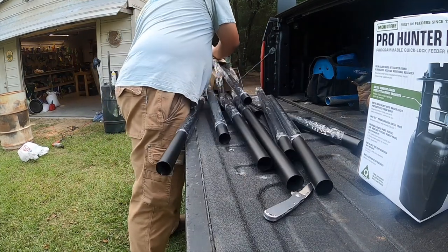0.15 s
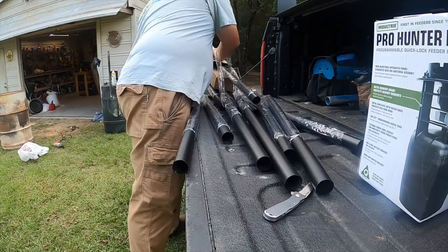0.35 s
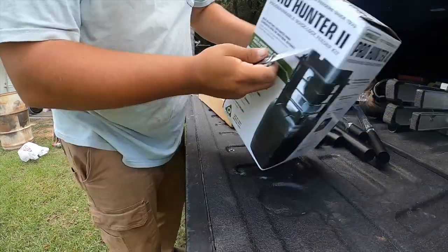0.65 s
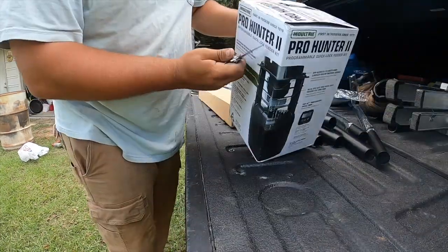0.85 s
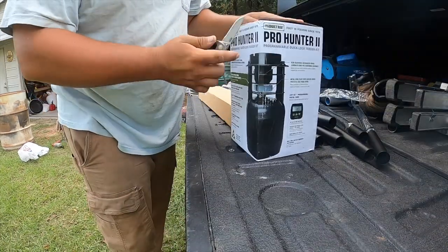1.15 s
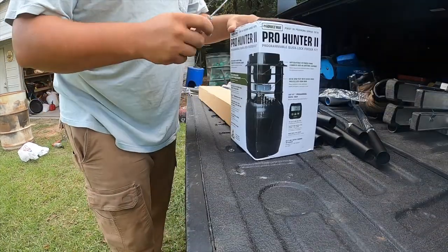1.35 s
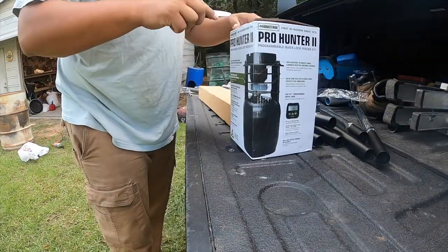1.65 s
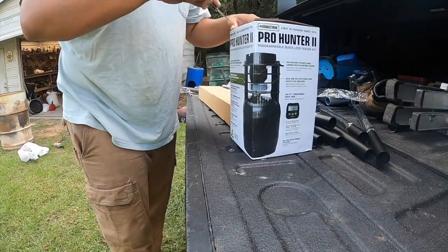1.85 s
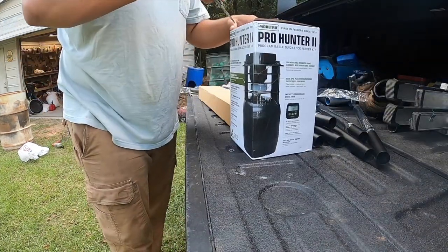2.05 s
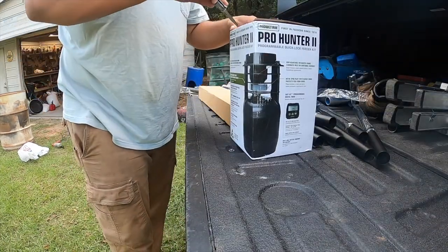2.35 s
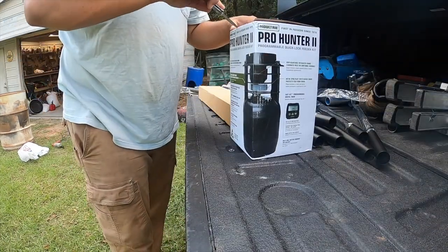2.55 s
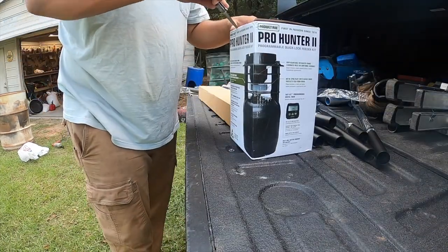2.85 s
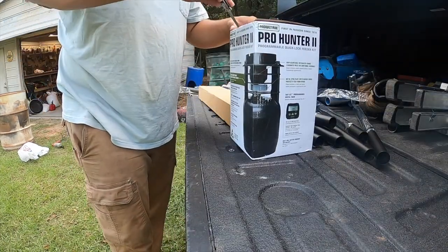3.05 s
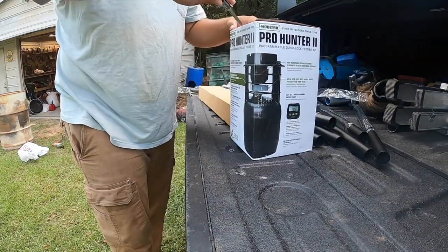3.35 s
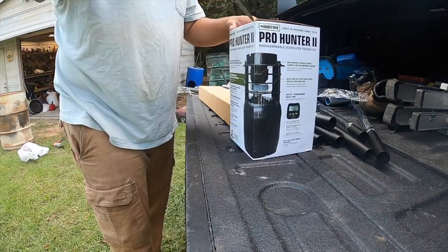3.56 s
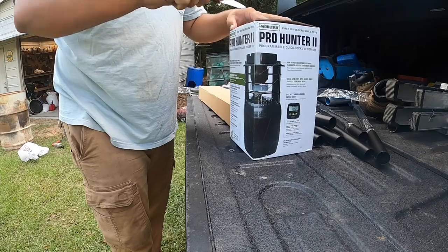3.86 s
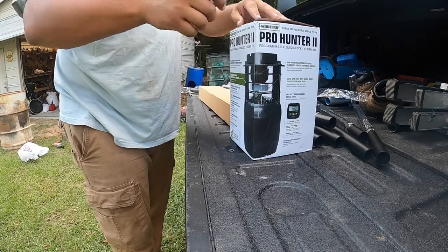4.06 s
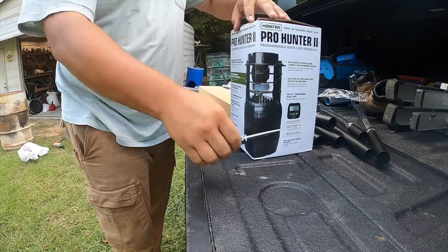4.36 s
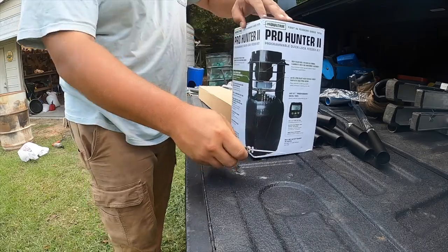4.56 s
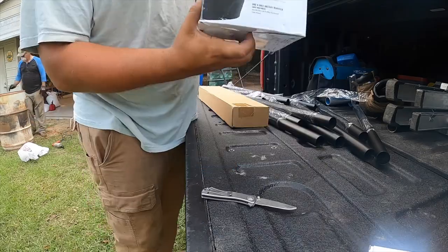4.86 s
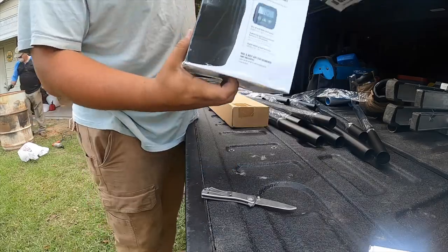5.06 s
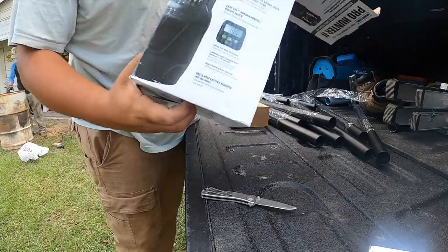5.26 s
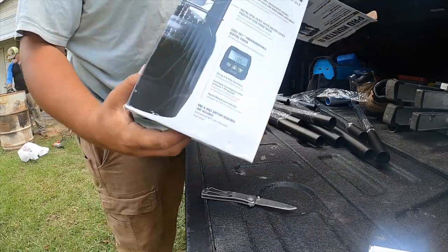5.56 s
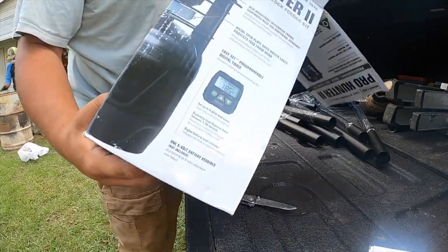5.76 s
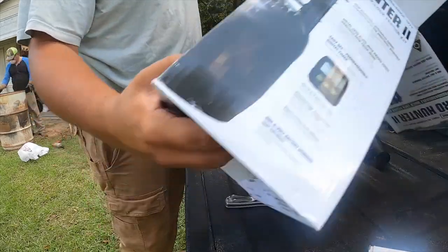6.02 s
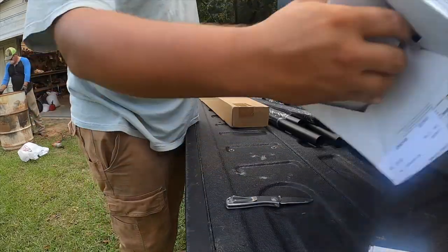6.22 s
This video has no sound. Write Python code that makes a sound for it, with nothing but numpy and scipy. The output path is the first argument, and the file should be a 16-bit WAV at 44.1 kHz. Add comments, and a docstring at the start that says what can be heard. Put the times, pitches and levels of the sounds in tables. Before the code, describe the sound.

Outdoors, heard closely in stereo from a tailgate: a burst of metallic clatter, then hollow cardboard thuds and a brief squeak. Light hand rubbing leads to a run of dry little tape cracks and a small knife click. Finally cardboard rasps and booms as the contents slide, with soft heavy thumps. A low engine-like rumble and thin insect hiss continue underneath.

```python
"""Hollow steel legs are shoved along a ribbed truck bed and clank together: dense slips scrape, tube modes ring.
A cardboard box is swung over and set down (panel modes), a knife pops its tape (cracks, pings) and clicks shut.
The box is tipped and its packing slides and tumbles out: friction noise, squeaks, a creak and knocks.
Across the yard a machine idles (coloured noise, hum, throbbing whine) and insects hiss in a high noise band.
Two close microphone ports on the tailgate take it all in, with scattered reflections."""
import sys
import numpy as np
from scipy import signal
from scipy.fft import rfft, irfft, next_fast_len
from scipy.io import wavfile
from scipy.ndimage import uniform_filter1d

SR = 44100
rng = np.random.default_rng(int(sys.argv[2]) if len(sys.argv) > 2 else 0)


def master_out(mix):
    """Clip the mix to full scale and print it as 16-bit PCM to the path in sys.argv[1]."""
    frames = np.transpose(np.atleast_2d(mix))
    ceiling = np.clip(frames, -1, 1)
    pcm = np.round(ceiling * 32767).astype(np.int16)
    wavfile.write(sys.argv[1], SR, pcm)


N = 281799
TIME = np.arange(N) / SR
TAIL = TIME[:SR]  # one second, long enough for any hit
FFT_SIZE = next_fast_len(N + SR // 4, real=True)
FFT_HZ = np.fft.rfftfreq(FFT_SIZE, 1 / SR)


def amp(db):
    """Decibel law: 20 dB is a tenfold gain."""
    return 10 ** (np.asarray(db) / 20)


def gain_at(points, hz):
    """Spectral envelope: gain of (Hz, dB) points joined on a log axis, falling off past the ends."""
    point_hz, point_db = np.transpose(points)
    hz = np.maximum(hz, 1)
    inside = amp(np.interp(np.log(hz), np.log(point_hz), point_db))
    falloff = np.minimum(1, np.minimum(hz / point_hz[0], point_hz[-1] / hz)) ** 2
    return inside * falloff


def colour(x, points):
    """Linear filtering: a steady sound is multiplied by a spectral envelope."""
    return irfft(rfft(x, FFT_SIZE) * gain_at(points, FFT_HZ), FFT_SIZE)[:N]


def band(x, lo, hi, order=2):
    """Causal band-pass filtering between two edges in Hz."""
    top = .48 * SR
    edges = [min(lo, top / 2), min(hi, top)]
    return signal.sosfilt(signal.butter(order, edges, "band", fs=SR, output="sos"), x)


def level(x, db):
    """Mean power: set the rms level."""
    return x * amp(db) / np.sqrt(np.mean(x ** 2))


def hit_level(x, db):
    """Impact energy: set it as the level it would have if spread over 20 ms."""
    return x * amp(db) / np.sqrt(np.sum(x ** 2) / (.02 * SR))


def walk(rate):
    """Slow random modulation: levels held 1 / rate s and slewed, with unit spread."""
    hold = int(SR / rate)
    steps = np.repeat(rng.standard_normal(N // hold + 1), hold)
    wander = uniform_filter1d(steps, hold)[:N]
    return wander / wander.std()


def add(track, s, x):
    """Superposition: mix a sound in at time s."""
    i = max(int(s * SR), 0)
    track[i:i + len(x)] += x[:N - i]


def fade(t, t60):
    """Exponential decay: 60 dB are lost in t60 seconds."""
    return np.exp(-np.log(1000) * t / t60)


def mode(hz, t60):
    """Free damped vibration: one fading sine."""
    return fade(TAIL, t60) * np.sin(2 * np.pi * hz * TAIL)


def ring(modes, scatter_db, detune):
    """Modal superposition: each contact point weights and detunes the modes a little differently."""
    out = 0
    for hz, db, t60 in modes:
        weight, shift = rng.standard_normal(2)
        out = out + amp(db + scatter_db * weight) * mode(hz * (1 + detune * shift), t60)
    return out


# Half-octave band-pass filters, each with its centre in Hz.
HALF_OCTAVES = [(hz, signal.butter(2, [hz / 2 ** .25, hz * 2 ** .25], "band", fs=SR, output="sos"))
                for hz in 110 * 2 ** (np.arange(15) / 2)]


def burst(points, t60, damping):
    """High modal density: fading noise in half octaves; t60 holds at 1 kHz, and higher bands die sooner."""
    t, out = TAIL[:SR // 5], 0
    for hz, sos in HALF_OCTAVES:
        noise = rng.standard_normal(len(t)) * fade(t, t60 * (1000 / hz) ** damping)
        part = level(signal.sosfilt(sos, noise), 0)
        out = out + part * gain_at(points, hz) * np.sqrt(hz)  # wider bands hold more power
    return out


def friction(points, rate, spread_db, patchy_db, patch_hz):
    """Dry friction: dense tiny slips of uneven size, coming in patches, through a body's spectrum."""
    sizes = amp(spread_db * rng.standard_normal(N))
    slips = (rng.random(N) < rate / SR) * rng.choice([-1, 1], N) * sizes
    patches = amp(patchy_db * walk(patch_hz))
    return level(colour(slips * patches, points), 0)


def pushes(table, attack_share, sag_db_per_s, release_t60):
    """Force envelopes: slides speed up, slacken and run out; one gain track for each dB column."""
    out = 0
    for s, length, *dbs in table:
        t = np.maximum(TIME - s, 0)
        attack = max(attack_share * length, 1 / SR)
        rise = np.minimum(t / attack, 1)
        hold = amp(-sag_db_per_s * np.clip(t - attack, 0, length))
        release = fade(np.clip(t - length, 0, 1), release_t60)
        out = out + np.outer(amp(dbs), rise * hold * release)
    return out


def tube(modes):
    """Fixed eigenfrequencies: a steel tube keeps its pitches wherever struck; mainly the weights change."""
    return ring(modes, scatter_db=.7, detune=.0004)


# Modes of the two steel legs. Each row: frequency in Hz, relative level in dB, t60 in seconds.
UPPER_LEG_MODES = [(1184, -1, .3), (1212, -17, .5), (1933, -18, .5), (2234, -15, .33), (2476, -16, .45),
                   (2789, -17, .5), (3225, -18, .55), (3515, -7, .34), (3881, -19, .5), (3941, -16, .36),
                   (4457, -19, .27), (4990, -23, .4), (5259, -21, .42), (6342, -27, .22), (7397, -28, .25),
                   (8656, -30, .3)]
LOWER_LEG_MODES = [(1189, 0, .35), (1927, -1, .37), (1967, -6, .37), (2013, -14, .5), (2089, -10, .45),
                   (2259, -8, .4), (2363, -15, .42), (2471, -10, .45), (2778, -9, .55), (2842, -13, .5),
                   (3354, -12, .55), (3564, -2, .25), (3871, -9, .4), (3935, -10, .45), (4554, -11, .4),
                   (4646, -9, .31), (5367, -7, .17), (5615, -19, .45), (6222, -16, .25), (7704, -19, .12),
                   (8382, -7, .11)]
# Leg against leg. Each row: start in seconds, then before the contact filter the upper leg, lower leg and
# clash levels in dB, and the upper edge of the contact bandwidth in Hz.
CLANKS = [(.004, -45, -30, -18, 5600), (.063, -11.5, -33, -28.5, 7560), (0.252, -26, -25.5, -24.5, 7040),
          (.282, -25, -20.5, -19.5, 14200), (.321, -39, -40, -24.5, 4960), (0.372, -41, -21.5, -48, 2130),
          (0.514, -47, -59, -40, 1500)]
# Spectra of the clash, the rumbling bed and the scraping steel. Each row: frequency in Hz, gain in dB.
CLASH_SPECTRUM = [(600, 8), (1300, 5), (1700, -2), (2500, -2), (4000, 0), (6000, -10.5), (9000, -5.5),
                  (14000, -42)]
BED_SPECTRUM = [(35, -45), (60, -35), (81, -6.5), (172, 4.5), (236, -7), (280, -1.5), (416, -14), (451, -7),
                (816, -16), (1050, -35), (1150, -34), (1210, -7.5), (1260, -28), (1400, -27), (1820, -111),
                (3080, -120)]
SCRAPE_SPECTRUM = [(800, 22.5), (1400, 11.5), (2600, 17.5), (4000, 9), (6500, 3), (10000, -11),
                   (15000, -27)]
# Shoves over the ribs. Each row: start and length in seconds, bed rumble and scrape levels in dB before the sag.
SHOVES = [(0.0, 0.27, -14.5, -25.5), (.252, 0.063, -17.5, -39), (.316, .04, -12.5, -32),
          (.425, 0.017, -29, -45), (.49, 0.14, -39, -47)]
# The legs come to rest against each other, which damps their ring: start in seconds, t60 in seconds.
REST = (0.52, 0.47)


def legs():
    """Stick-slip and impact excitation: shoved legs rumble and scrape, collisions clash and ring the tubes."""
    rumble, scrape = pushes(SHOVES, attack_share=0.01, sag_db_per_s=41.5, release_t60=0.2)
    ribs = friction(BED_SPECTRUM, rate=1500, spread_db=2, patchy_db=1, patch_hz=60)
    grit = friction(SCRAPE_SPECTRUM, rate=6000, spread_db=3, patchy_db=1, patch_hz=80)
    scraping = scrape * grit
    out = rumble * ribs + scraping

    # the scraping keeps up a ring in the tubes, set relative to the scrape itself
    sung = signal.fftconvolve(scraping, tube(UPPER_LEG_MODES) + tube(LOWER_LEG_MODES))[:N]
    ringing = level(sung, -8.5) * np.std(scraping)

    others = pile(count=70, low_hz=1276, high_hz=8990, t60=0.33)
    # the tubes buzz against each other, so their ring builds up after the clash
    buildup = 1 - fade(TAIL, .04)
    for s, upper_db, lower_db, clash_db, contact_hz in CLANKS:
        upper = hit_level(tube(UPPER_LEG_MODES), upper_db)
        lower = hit_level(tube(LOWER_LEG_MODES), lower_db)
        sympathy = hit_level(tube(others), clash_db - 6)
        clash = hit_level(burst(CLASH_SPECTRUM, t60=0.11, damping=0.89), clash_db)
        add(ringing, s, band((upper + lower + sympathy) * buildup, 200, contact_hz, order=1))
        add(out, s, band(clash, 200, contact_hz, order=1))
    rest_s, rest_t60 = REST
    return out + ringing * fade(np.maximum(TIME - rest_s, 0), rest_t60)


def pile(count, low_hz, high_hz, t60):
    """Sympathetic resonance: the other legs ring on many pitches, shorter as they rise, in the scrape's spectrum."""
    hz = low_hz + (high_hz - low_hz) * (np.arange(count) + rng.random(count)) / count
    db = 20 * np.log10(gain_at(SCRAPE_SPECTRUM, hz))
    return np.transpose([hz, db, t60 * np.sqrt(low_hz / hz)])


# Blows on the box. Each row: start in seconds, knock, thump and tick levels in dB, boom pitch in Hz,
# boom t60 in seconds.
KNOCKS = [(.630, -21.5, -10.5, -36.5, 197, .26), (.646, -22.5, -20.5, -41, 530, 0.055),
          (.699, -28, -28.5, -47, 193, .26), (.778, -32, -26.5, -47.5, 257.2, 0.056),
          (.82, -31.5, -49, -35.5, 180, .09), (.825, -45, -17, -54, 118.4, 0.096),
          (.839, -27, -22.5, -51, 458, 0.028), (.871, -39.5, -24.5, -53, 176.5, .19),
          (.935, -37.5, -43, -59, 368, .07), (1.037, -47.5, -40, -61, 197, .11),
          (1.076, -38, -30, -46.5, 132, 0.17), (1.389, -50, -48, -54, 394, .15),
          (1.711, -47.5, -43, -59, 370, 0.066), (5.353, -33.5, -41, -68, 407, .1),
          (5.713, -35, -35, -43, 166, .2), (5.808, -30, -46, -64, 240, .044),
          (5.86, -36, -18, -51, 115, 0.16), (5.868, -27, -32, -50, 320, .16),
          (5.936, -35, -15.5, -64, 87.4, .19), (6.003, -35, -15.5, -61, 141.5, .12),
          (6.059, -33.5, -17, -51, 88, .25), (6.159, -62, -34.5, -48.5, 190, .17),
          (6.352, -53, -50.5, -56.5, 194, .065)]
# Modes of the whole box. Each row: frequency in Hz, relative level in dB, t60 in seconds.
BOX_MODES = [(98, -11, .12), (119.5, -13.5, 0.038), (157.6, -1.5, 0.11), (196, -1, 0.098),
             (237, -14.5, 0.078), (311.6, -14.5, 0.17), (374.5, -11.5, 0.12), (470, -5, 0.016)]
# Spectra of the papery knock and the contact tick. Each row: frequency in Hz, gain in dB.
KNOCK_SPECTRUM = [(250, -14), (500, 13.5), (750, -7), (950, 7.5), (1300, -2), (1800, -10), (2500, -11.5),
                  (3400, -15.5), (5000, -35.5)]
TICK_SPECTRUM = [(2500, -3), (4000, 12), (6000, -11.5), (9000, -8), (14000, -58)]


def box_knocks():
    """Plate impact: a contact tick, a papery knock, and the struck panel's boom with the box behind it."""
    out = np.zeros(N)
    swing = 1 - fade(TAIL, 0.024)  # heavy contents take a moment to swing
    for s, knock_db, thump_db, tick_db, boom_hz, t60 in KNOCKS:
        panel = hit_level(mode(boom_hz, t60), 0)
        box = hit_level(ring(BOX_MODES, scatter_db=10, detune=0.031), 0.59)
        add(out, s, hit_level((panel + box) * swing, thump_db))
        add(out, s, hit_level(burst(KNOCK_SPECTRUM, t60=0.056, damping=0.44), knock_db))
        add(out, s, hit_level(burst(TICK_SPECTRUM, t60=0.016, damping=0.82), tick_db))
    return out


# Tape popping under the blade. Each row: start in seconds, snap and panel levels in dB, tape pitch in Hz,
# tape ring level in dB.
SNAPS = [(2.9681, -33.5, -27, 1550, -31), (3.0314, -41, -35.5, 1680, -39), (3.0425, -50, -47, 6500, -58),
         (3.049, -50, -45, 5500, -58), (3.054, -38.5, -32, 4530, -42), (3.158, -54, -70, 4170, -70),
         (3.3332, -53, -43.5, 4200, -52), (3.343, -41, -35.5, 1150, -46), (3.3625, -52, -37, 2800, -53),
         (3.4295, -70, -52, 3970, -56.5), (3.5284, -36, -28, 4240, -34), (3.541, -53, -27.5, 2180, -58),
         (3.552, -52, -38, 960, -41), (3.6439, -43.5, -40, 1740, -34)]
# Spectra of the crack and the lid panel. Each row: frequency in Hz, gain in dB.
SNAP_SPECTRUM = [(1000, -1), (1800, 4), (3000, -1.5), (4500, 4), (7000, -2), (10000, -7.5), (15000, -37)]
PANEL_SPECTRUM = [(120, 10), (230, 8.5), (450, -3.5), (800, -3.5), (1500, -6.5), (2500, -10), (4000, -18.5)]


def tape_snaps():
    """Release of tension: taut tape cracks and pings; the slower bending wave of the lid follows."""
    out = np.zeros(N)
    for s, snap_db, panel_db, tape_hz, tape_db in SNAPS:
        add(out, s, hit_level(burst(SNAP_SPECTRUM, t60=.009, damping=.5), snap_db))
        add(out, s + 0.000925, hit_level(mode(tape_hz, t60=.007), tape_db))
        # the air enclosed in the box hums on, below the panel's level
        add(out, s + 0.00051, hit_level(mode(240.6, t60=0.52), panel_db - 11.5))
        add(out, s + 0.00101, hit_level(burst(PANEL_SPECTRUM, t60=0.043, damping=0.23), panel_db))
    return out


# Small hard clicks, mostly the folding knife. Each row: start in seconds, level in dB, lowest ringing
# frequency in Hz.
CLICKS = [(4.345, -50, 3500), (4.351, -51, 3000), (4.355, -30, 1510), (4.658, -61, 1000),
          (4.766, -55.5, 1500), (5.987, -35.5, 6700)]
# Spectrum of a click. Each row: frequency in Hz, gain in dB.
CLICK_SPECTRUM = [(1000, -31), (2300, -3), (3300, -12), (4300, -13), (5200, -6), (6100, -6), (7400, -14.5),
                  (10000, -15), (11200, -23), (15000, -15)]


def clicks():
    """Hard-body impact: short ticks with a faint after-ring."""
    out = np.zeros(N)
    for s, db, low_hz in CLICKS:
        tick = hit_level(burst(CLICK_SPECTRUM, t60=.005, damping=.2), 0)
        after = hit_level(burst(CLICK_SPECTRUM, t60=0.089, damping=0.18), -14.5)
        add(out, s, hit_level(band(tick + after, low_hz, 9900), db))
    return out


# Spectrum of the stiff flap. Each row: frequency in Hz, gain in dB.
FLAP_SPECTRUM = [(250, 14.5), (700, -8), (1100, -6.5), (1590, 11), (1950, -4), (2300, -2), (3100, 3),
                 (4500, -20), (7800, -11), (14000, -47)]


def flap_creak():
    """Stick-slip: a flap catches and slips unevenly on the packing, weaker as it comes free."""
    out = np.zeros(N)
    start_s, length_s, slip_gap_s, jitter_s = 5.4356, 0.06, .0085, .0015
    first_db, fall_db = -29, 3
    for t in np.arange(0, length_s, slip_gap_s):
        db = first_db - fall_db * (t / length_s) ** 2
        slip_s = start_s + t + jitter_s * rng.standard_normal()
        add(out, slip_s, hit_level(burst(FLAP_SPECTRUM, t60=0.063, damping=0.37), db))
    return out


# Strokes of hand, blade or packing on cardboard. Each row: start and length in seconds, panel boom, edge rasp
# and face hiss levels in dB before the sag.
STROKES = [(.635, 0.05, -24.5, -36.5, -51), (1.0, 0.17, -42, -51.5, -56), (1.212, 0.041, -36.5, -45, -48),
           (1.37, 0.044, -42.5, -49.5, -60), (1.78, .17, -61, -56, -64), (2.05, 0.15, -68, -58, -68),
           (2.6, 0.22, -81, -61, -56.5), (3.44, 0.12, -48, -55, -54), (3.53, .11, -45.5, -43, -51.5),
           (4.1, .08, -65, -54, -55), (4.53, 0.36, -47.5, -53.5, -61), (4.86, 0.38, -36, -37.5, -41),
           (4.895, 0.037, -36.5, -46.5, -48.5), (5.25, .16, -28.5, -43.5, -53.5),
           (5.432, 0.034, -34, -30.5, -51), (5.5, 0.12, -38.5, -50, -59), (5.615, .18, -25, -38, -46),
           (5.845, 0.084, -24.5, -38, -50.5), (5.98, .13, -26.5, -49.5, -58.5),
           (6.355, 0.035, -47, -46, -65)]
# Fingers shifting lightly while the box is held: the same columns, with levels in dB before they wander.
GRIP = (1.5, 5.25, -59.5, -65.5, -68)
# Packing gliding out along the smooth inner wall: start and length in seconds, level in dB before the sag.
GLIDE = (4.895, 0.363, -36)
# Spectra of panels, edges, faces and the smooth wall. Each row: frequency in Hz, gain in dB.
BOOM_SPECTRUM = [(50, -28), (90, 6), (170, 2.5), (260, 0), (380, -2), (600, -9.5), (900, -17.5),
                 (1400, -21.5), (2500, -35)]
RASP_SPECTRUM = [(400, -62), (800, -4.5), (1200, 2.5), (1700, 1), (2200, -1.5), (2900, -3), (4000, -15),
                 (6000, -55)]
HISS_SPECTRUM = [(2000, -12), (3800, -0.5), (5500, -5), (7500, -11), (9500, -11), (12000, -25),
                 (15500, -33)]
SHEEN_SPECTRUM = [(3000, -1), (6000, -0.5), (8500, -5), (10000, -7.5), (12000, -12), (15500, -25)]


def rubbing():
    """Sliding friction on cardboard: the panels boom, the edges rasp, smooth faces hiss."""
    release_t60 = .2
    shifting = amp(5 * walk(6.4))  # spread in dB, shifts per second
    grip = pushes([GRIP], 0, 0, release_t60) * shifting
    strokes = pushes(STROKES, attack_share=0.24, sag_db_per_s=10.5, release_t60=release_t60)
    boom, rasp, hiss = np.hypot(grip, strokes)  # independent sources add in power
    glide, = pushes([GLIDE], attack_share=0.34, sag_db_per_s=34, release_t60=0.043)
    panels = friction(BOOM_SPECTRUM, rate=1200, spread_db=2.5, patchy_db=1, patch_hz=50)
    edges = friction(RASP_SPECTRUM, rate=4000, spread_db=4, patchy_db=1.2, patch_hz=110)
    faces = friction(HISS_SPECTRUM, rate=14000, spread_db=3.5, patchy_db=.7, patch_hz=120)
    wall = friction(SHEEN_SPECTRUM, rate=25000, spread_db=2, patchy_db=.5, patch_hz=120)
    return boom * panels + rasp * edges + hiss * faces + glide * wall


# Cardboard chattering briefly on one resonance. Each row: start and length in seconds, frequency in Hz,
# level in dB before the swell shapes it.
SQUEAKS = [(0.694, 0.025, 1240, -28.5), (0.696, 0.02, 3300, -36.5), (4.119, 0.065, 1046, -47.5),
           (5.638, 0.047, 1590, -44), (5.736, 0.034, 2640, -33.5), (5.799, 0.049, 1040, -36),
           (6.362, .04, 1840, -48)]


def squeaks():
    """Resonant stick-slip: rough slips catch one resonance, swell and let go."""
    out = np.zeros(N)
    for s, length, hz, db in SQUEAKS:
        swell = np.sin(np.pi * np.minimum(TAIL / length, 1))
        slips = (rng.random(len(TAIL)) < 900 / SR) * rng.standard_normal(len(TAIL))
        add(out, s, swell * level(band(slips, hz / 1.18, hz * 1.18, order=2), db))
    return out


# Spectra of the yard's rumble and the insects. Each row: frequency in Hz, gain in dB.
YARD_SPECTRUM = [(11, -53), (18, -8), (37, 1), (59, -1.5), (71, 0.5), (100, -24.5), (247, -29), (557, -47),
                 (899, -47), (1190, -42.5), (2340, -51.5), (2550, -52), (6630, -56.5), (7850, -68.5),
                 (15000, -90)]
INSECT_SPECTRUM = [(6000, -48), (7300, -8), (7890, -1.5), (8400, -8.5), (9300, -26)]
# Hum of the idling machine. Each row: frequency in Hz, level in dB.
HUM = [(52.5, -39.5), (71, -51.5), (94, -55.5), (121, -58.5), (240, -66.5)]


def yard():
    """Periodic modulation over diffuse noise: a machine rumbles, hums and throbs once a turn; insects hiss."""
    idle_hz, whine_hz = 24.3, 1180
    air, left, right = (level(colour(rng.standard_normal(N), YARD_SPECTRUM), -36.5) for _ in range(3))
    # the two ports share the air noise and differ more towards the treble
    spread = [(20, -27.5), (300, -2.5), (1200, 1.0), (4000, 3.5), (15000, 6.5)]  # (Hz, dB)
    diffuse = np.array([colour(x, spread) for x in (left, right)])
    hum = sum(level(np.sin(2 * np.pi * hz * TIME + 0.65 * walk(4.4)), db) for hz, db in HUM)
    throb = 1 + 1.04 * np.sin(2 * np.pi * idle_hz * TIME + 0.25 * walk(2.1))
    whine = level(throb * np.sin(2 * np.pi * whine_hz * TIME + .4 * walk(10)), -63.5)
    whirr = level(throb * band(rng.standard_normal(N), 987, 1060), -70.5)
    insects = np.array([level(colour(rng.standard_normal(N), INSECT_SPECTRUM) * amp(1.6 * walk(20)), -66.0)
                        for _ in range(2)])
    return air + hum + whine + whirr + diffuse + insects


# Reflections over direct sound. Each row: frequency in Hz, ratio in dB.
SCATTER = [(100, -17.5), (500, -17.5), (1200, -9), (2300, -2), (4000, -3.5), (8000, 0.5), (14000, -1.5)]
# Left port minus right port. Each row: frequency in Hz, difference in dB.
LEFT_PORT = [(100, -2.5), (1200, -0.5), (2300, 0.5), (4000, 0), (8000, -5.5), (14000, -2)]


def tailgate(x, lag_s, t60, pan_db):
    """Arrival lag and scattering: the right port hears first; bed walls scatter moving sources to each port."""
    echoes = rng.standard_normal((2, 2, len(TAIL))) * fade(TAIL, t60) * (1 - fade(TAIL, 0.0032))
    echoes /= np.sqrt(np.sum(echoes ** 2, axis=-1, keepdims=True))
    inside = np.clip(FFT_HZ, LEFT_PORT[0][0], LEFT_PORT[-1][0])
    wet = gain_at(SCATTER, inside)
    balance = np.sqrt(gain_at(LEFT_PORT, inside) * amp(pan_db))
    # direct and scattered power together keep the source's power
    ports = rfft(x, FFT_SIZE) * np.array([balance, 1 / balance]) / np.sqrt(1 + wet ** 2)
    delay = np.exp(-2j * np.pi * FFT_HZ * np.array([[lag_s], [0]]))
    direct = irfft(ports * delay, FFT_SIZE)[:, :N]
    # two sets of echoes, blended as the source moves between two places
    here, there = irfft(ports * wet * rfft(echoes, FFT_SIZE), FFT_SIZE)[..., :N]
    position = 1.7 * walk(18)
    return direct + here * np.cos(position) + there * np.sin(position)


def scene():
    """Superposition: all the handling on the tailgate, over the yard."""
    return (tailgate(legs(), lag_s=.000048, t60=0.13, pan_db=-0.8)
            + tailgate(box_knocks(), lag_s=.000045, t60=0.16, pan_db=-1.5)
            + tailgate(tape_snaps() + clicks(), lag_s=.000036, t60=0.019, pan_db=-0.5)
            + tailgate(flap_creak() + rubbing() + squeaks(), lag_s=.000032, t60=0.028, pan_db=1.46)
            + yard())


def record(dry):
    """Saturation and band limiting: the loudest peaks are rounded and the top is cut above 15.6 kHz."""
    rounded = np.tanh(dry)
    return signal.sosfilt(signal.ellip(8, .2, 70, 15600, fs=SR, output="sos"), rounded)


dry = scene()
out = record(dry)
master_out(out)
```